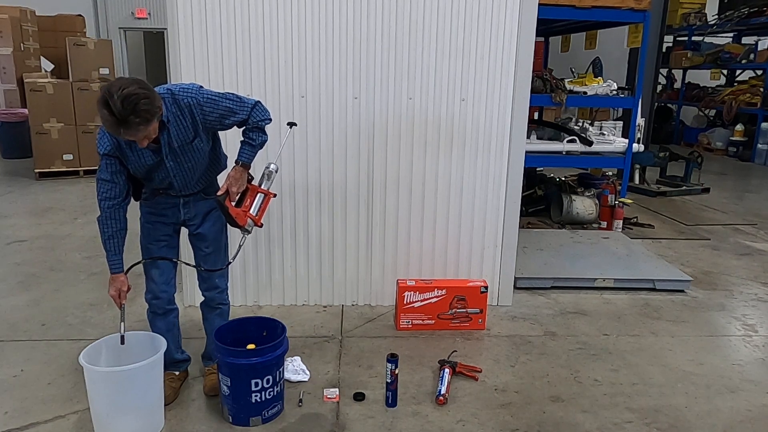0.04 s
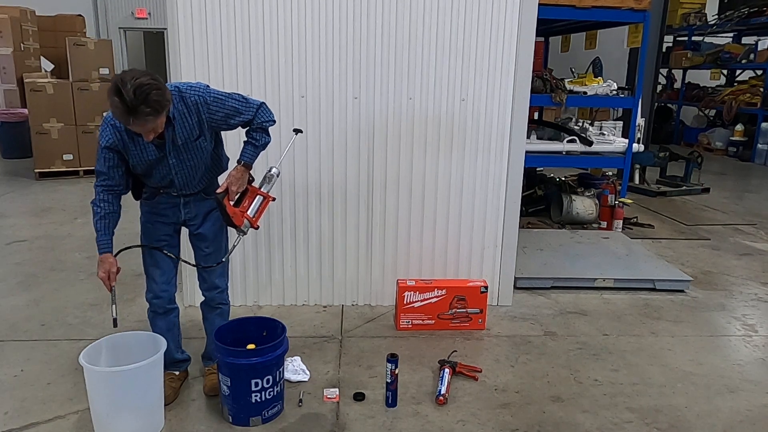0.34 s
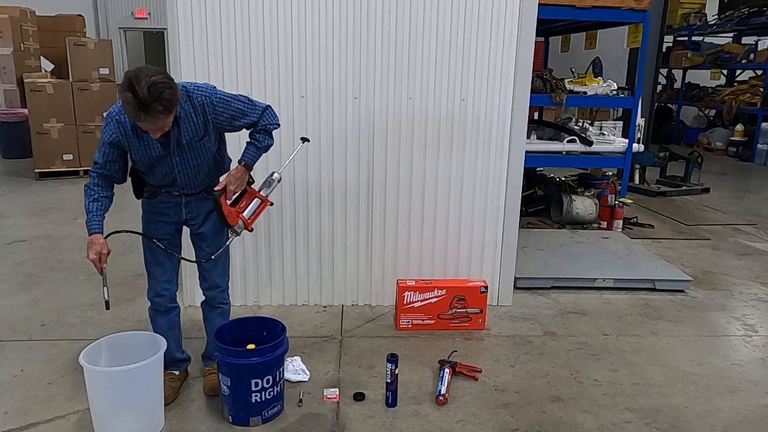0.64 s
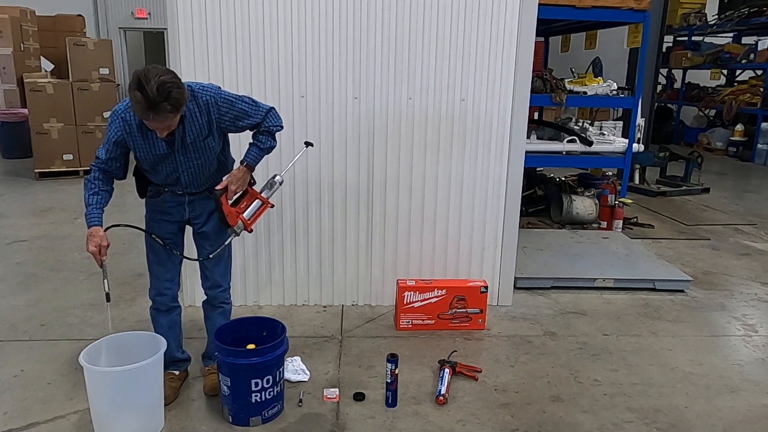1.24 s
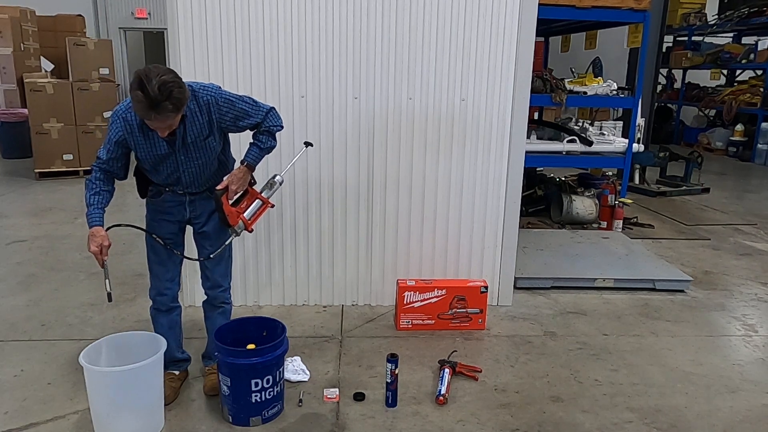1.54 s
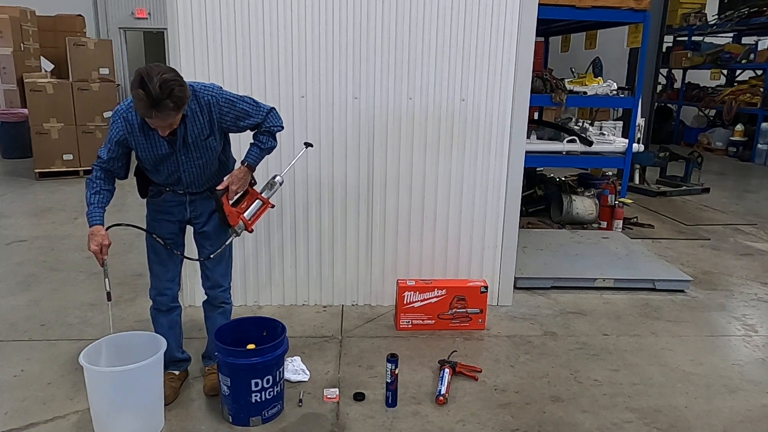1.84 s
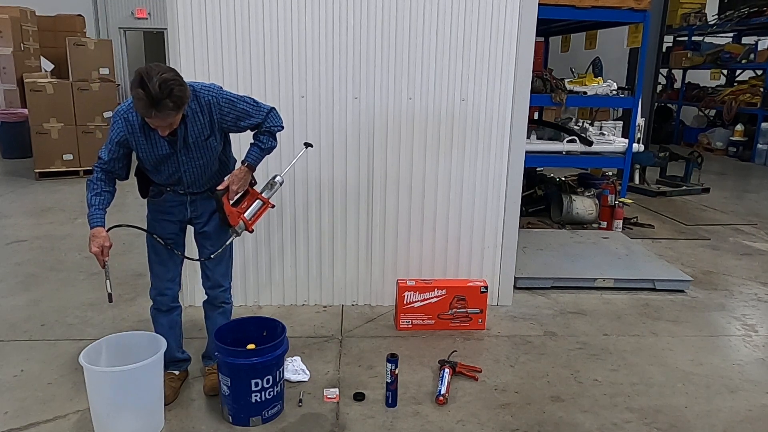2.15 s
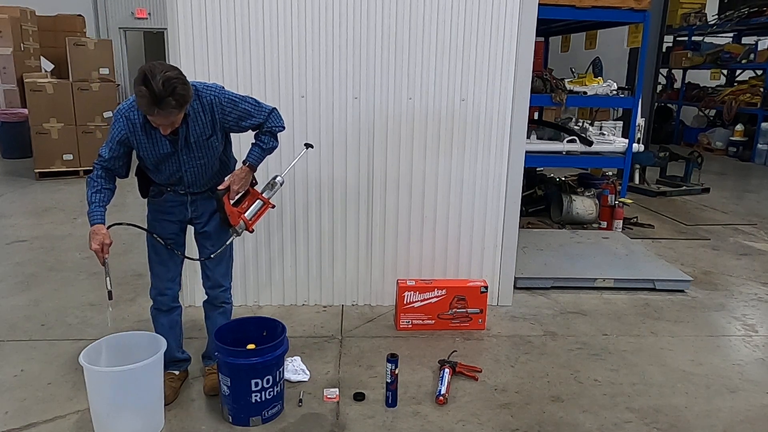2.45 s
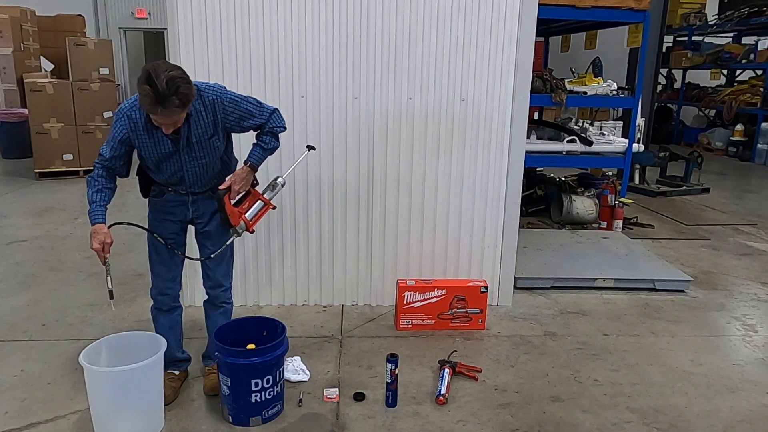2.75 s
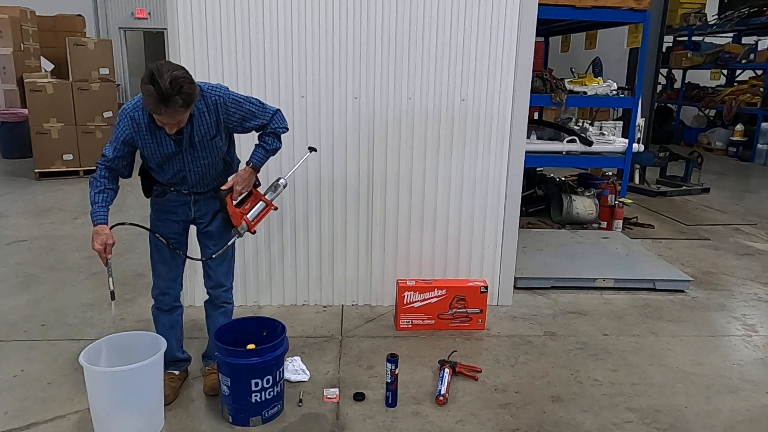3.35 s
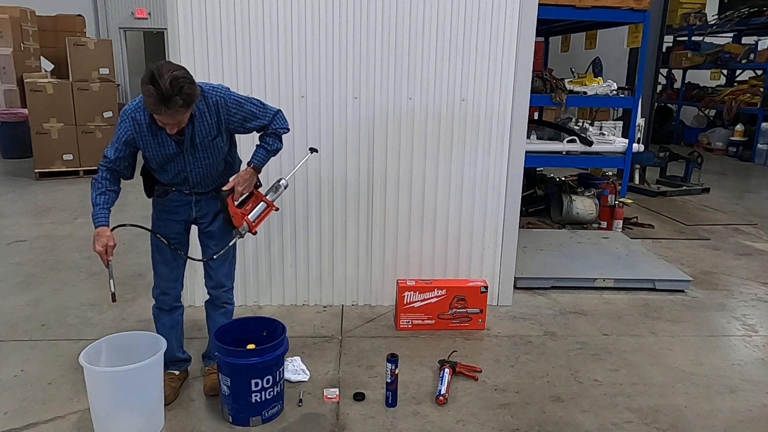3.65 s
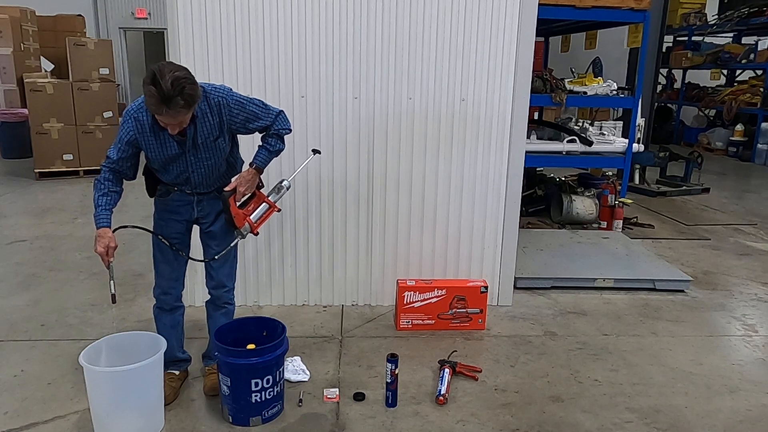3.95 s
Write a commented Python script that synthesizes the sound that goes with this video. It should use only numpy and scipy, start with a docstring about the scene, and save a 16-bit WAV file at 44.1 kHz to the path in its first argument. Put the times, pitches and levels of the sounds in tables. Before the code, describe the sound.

Electric grease gun whirring with rhythmic pitch dips, grease slapping wetly into a bucket.

```python
"""A battery grease gun runs without a break in a large workshop. Its motor and gears whine and whir,
and the pitch sags each time a piston stroke slows the motor. Blobs of grease drop from the hose
into an empty plastic bucket with a wet slap and a thud, and a few bubbles pop. Air spits from the
nozzle, mostly faintly; once an air pocket shoots a blob into the bucket with a hard knock.
Ventilation rumbles underneath."""
import sys
import numpy as np
from scipy import signal
from scipy.fft import rfft, irfft, next_fast_len
from scipy.io import wavfile
from scipy.ndimage import map_coordinates

SR = 44100
rng = np.random.default_rng(int(sys.argv[2]) if len(sys.argv) > 2 else 0)


def unload_wav(signal):
    """Save mono or channel-first audio to the path in sys.argv[1] as 16-bit WAV at rate SR, clipped to [-1, 1]."""
    wavfile.write(
        sys.argv[1],
        SR,
        np.round(np.clip(np.atleast_2d(signal).T, -1, 1) * 32767).astype(np.int16),
    )


N = 176400

# Levels in dB are relative. A fade time (t60) is how long a sound takes to drop by 60 dB.
# The workshop's echo. Each row: frequency in Hz, fade time in seconds.
ECHO_FADES = [(150,1),(400,0.5),(700,0.63),(2000,0.72),(6000,0.37),(14000,0.27)]
# How alike noise is on the left and right. Each row: frequency in Hz, likeness (1 is the same).
STEREO_LIKENESS = [(50,0.98),(300,0.94),(700,0.87),(1500,0.94),(3000,0.88),(5500,0.73),(8000,0.67),(13000,0.65)]
# The left microphone against the right. Each row: frequency in Hz, extra level in dB.
MIC_BALANCE = [(60, 0.5), (110, -2), (200, 1.5), (380, -1), (700, 0.5), (1290, -0.5), (2380, 2.5),
               (4400, 1.5), (8120, -4), (15000, -1.5)]
# Each row: frequency in Hz, how far the left microphone leads in radians.
MIC_PHASE = [(50,0.19),(1100,-0.23),(2300,-0.55),(4500,-0.59),(7500,-1.3),(9000,0.008),(14000,-0.58)]

# The tone colour of each noise. Each row: frequency in Hz, level in dB.
DUCT_SPECTRUM = [(20,-12),(34,-7),(42,-11),(48,10.5),(54,-5),(62,-8),(80,-5),(110,-12.5),(170,-13),(300,-20),(1000,-30),(4000,-70)]
SPIT_SPECTRUM = [(1000,-34),(4500,-22),(7000,2.5),(8500,-4),(10500,-5.5),(12500,-11),(15500,-30)]
CRACK_SPECTRUM = [(300,-11),(1400,-4),(3200,0),(5000,-3),(8000,-7),(10000,-22),(15000,-34)]
SLAP_SPECTRUM = [(100,-24),(250,-9),(450,-1),(520,-5),(650,-0.5),(790,-5),(1000,-3),(1450,-1.5),(1900,-8.5),(3200,-3),(5000,-13),(8000,-16),(15000,-39)]
WHIR_SPECTRUM = [(100,-18),(250,-50),(370,-7),(520,-16),(800,-10),(1000,-9),(1300,-4.5),(2000,0.5),(2900,0),(3800,1.5),(4300,3),(4900,-3.5),(5700,-3.5),(6600,-6),(7100,-9),(8400,-14),(9400,-20.5),(10200,-19),(11000,-25),(13000,-27),(15500,-39.5)]

# Bubbles bursting in the grease. Each row: start in seconds, pitch in Hz, level in dB.
BUBBLES = [(.343,1590,-29),(.904,1050,-26),(3.021,740,-27),(3.041,1429,-23)]
# Air leaving the nozzle. Each row: start in seconds, level in dB, fade time in seconds.
AIR_SPITS = [(.272,-43.5,0.18),(1.375,-50,0.16),(1.861,-21,0.03),(1.893,-42,0.034)]
# The bucket's modes (the notes it rings at) when hit hard. Each row: pitch in Hz, level in dB.
KNOCK_MODES = [(380,-8.5),(610,-10.5),(915,-7),(1160,-9),(1400,-1.5),(1600,-4),(2350,-8),(3080,-1.5),(3330,-6)]
# Its modes under a soft blob. Each row: pitch in Hz, level in dB, fade time in seconds.
THUD_MODES = [(161,-9,0.097),(179.5,-8,0.166),(225,-11,0.15),(270,-18.5,0.19),(311.7,-6.5,0.15),(334.4,-2.5,0.15),(371.4,-5,0.096),(420,-4,0.081),(591.5,-10.5,0.062),(709,-14,0.11),(914,-15,0.11)]
# Blobs landing. Each row: start in seconds, thud level in dB, thud centre in Hz,
# slap level in dB, slap centre in Hz.
BLOBS = [(.005,-38,168,-55,500),(0.324,-40,330,-39,1200),(.343,-31.5,300,-27.5,1410),(0.377,-30.5,300,-40.5,900),(.425,-39.5,300,-39,900),(.5,-37,201,-43,700),(.58,-37,290,-47,700),(.903,-31,800,-23.5,1220),(.915,-32,710,-28.5,1300),(.942,-33,520,-31.5,900),(.964,-24,483,-32,800),(1.023,-29.5,350,-38,800),(1.145,-33.5,270,-47,700),(1.423,-27.5,260,-29,1000),(1.473,-27,255,-25,1000),(1.531,-33,300,-36,600),(1.643,-27,354.3,-33,600),(1.712,-40,260,-51,700),(1.909,-29,320,-19.5,1400),(2.046,-31.5,200,-41,720),(2.159,-31.5,257.6,-36,596),(2.552,-41.5,257,-36,900),(2.658,-31,253,-39.5,709),(2.815,-36,296,-61,700),(2.878,-32,393,-50,700),(3.021,-38,600,-34,750),(3.043,-28.5,357.7,-33.5,1100),(3.101,-30,384,-36,700),(3.125,-22.5,410,-32,750),(3.296,-34.5,420,-46,700),(3.648,-33,370,-33,696.5),(3.662,-29.5,420,-53,600),(3.739,-34,380,-43,696),(3.813,-34.5,317,-45,700)]

# Where the gun's housing rings. Each row: centre in Hz, width in Hz, level in dB.
HOUSING_MODES = [(1185,74,-2.5),(1577,100,2.5),(2178,183,1),(3445,150,-3.5),(3840,190,-3.5),(5736,230,-4.5)]
# Piston strokes. Each row: middle in seconds, drop in motor speed in Hz, half length in seconds.
PISTON_STROKES = [(0.3, 7.661, 0.085), (0.851, 8.75, 0.084), (1.376, 7.819, 0.081), (1.918, 9.105, 0.087),
                  (2.462, 10.309, 0.091), (2.992, 8.501, 0.095), (3.546, 8.53, 0.076),
                  (4.079, 9.009, 0.085)]
# The motor without load. Each row: time in seconds, speed in Hz (turns a second).
FREE_MOTOR_SPEED = [(0.0, 374.1), (0.55, 377.1), (1.1, 374.5), (1.65, 376.5), (2.2, 375.4), (2.7, 377),
                    (3.25, 376.8), (3.8, 375.3)]
# How four tones of the gun swell and dip. Each row: time in seconds, level in dB.
MAIN_WHINE_LEVELS = [(0.0, -37), (0.05, -32), (0.14, -44), (0.19, -33.5), (0.37, -34), (0.66, -31),
                     (0.69, -36.5), (0.86, -28.5), (1.05, -34.5), (1.36, -30), (1.83, -31), (1.9, -33.5),
                     (2.06, -28.5), (2.08, -30.5), (2.24, -31), (2.27, -26), (2.42, -36), (2.45, -44),
                     (2.58, -30), (2.77, -32), (2.83, -27.5), (3.0, -42), (3.04, -32.5), (3.16, -37.5),
                     (3.32, -32), (3.48, -34.5), (3.52, -41), (3.59, -33), (3.87, -28.5), (4.0, -33)]
LOW_WHINE_LEVELS = [(0.0, -41), (0.13, -44.5), (0.19, -38), (0.68, -43), (0.81, -36.5), (1.02, -43.5),
                    (1.36, -37.5), (1.64, -40.5), (1.65, -42), (2.23, -36.5), (2.32, -47), (2.35, -37),
                    (2.49, -51), (2.61, -36), (2.88, -35.5), (2.97, -49), (3.14, -35), (3.26, -42.5),
                    (3.41, -33.5), (3.51, -48.5), (3.74, -33), (3.81, -37), (3.95, -32), (4.0, -39)]
GEAR_TONE_LEVELS = [(0.0, -51), (0.26, -46), (0.75, -47), (0.77, -41), (1.24, -47), (1.3, -41), (1.54, -47),
                    (1.61, -40), (1.8, -46), (1.84, -42), (2.31, -44), (2.38, -39), (2.49, -44),
                    (3.01, -42), (3.42, -49), (3.45, -41), (3.87, -41), (4.0, -40)]
OCTAVE_LEVELS = [(0.0, -56), (0.72, -54), (0.89, -67), (0.91, -58), (1.24, -54.5), (1.4, -63), (1.56, -54),
                 (1.75, -54.5), (1.84, -64), (1.86, -52), (1.93, -62), (2.31, -59), (2.36, -68),
                 (2.45, -53), (2.56, -67), (2.9, -62), (2.99, -55), (3.09, -65), (3.31, -69), (3.58, -53),
                 (3.63, -68), (4.0, -60)]
# Weaker motor and gear tones. The three lists give each tone's multiple of the motor speed,
# its level in dB without load, and its change in dB at full load.
WEAK_MULTIPLES = [1, 3, 5.92, 6, 9.2, 9.56, 9.8, 18, 21]
WEAK_LEVELS = [-56.5, -46.5, -63, -45.5, -57, -56, -50, -56, -62.5]
WEAK_LOAD_CHANGES = [-6, -2.5, 18.5, -14, 4, -9, 2, 0, 7]


def amp(db):
    """Turn decibels into a gain to multiply by."""
    return 10 ** (np.asarray(db) / 20)


def unit(x):
    """Scale a signal to an average power of 1."""
    return x / np.sqrt(np.mean(x ** 2) + 1e-20)


def along(points, hz):
    """Read between (Hz, value) points on a log-frequency axis."""
    freqs, values = np.transpose(points)
    return np.interp(np.log(hz + 1), np.log(freqs + 1), values)


def shape(points):
    """Turn (Hz, dB) points into a function giving the gain at any frequency."""
    return lambda hz: amp(along(points, hz))


def around(hz, centre_hz, octaves):
    """A bell-shaped gain that favours frequencies near the centre."""
    return np.exp(-0.5 * (np.log2((hz + 1) / centre_hz) / octaves) ** 2)


def curve(rows):
    """Join (seconds, value) points into one value per sample."""
    return np.interp(np.arange(N) / SR, *np.transpose(rows))


def wobble(rate):
    """A smooth curve through `rate` random values a second."""
    return map_coordinates(rng.standard_normal(8192), [np.arange(N) * rate / SR + 2], mode="wrap")


def rise(t, seconds):
    """Climb from 0 towards 1, softening the start of a sound."""
    return 1 - np.exp(-t / seconds)


def fade(t, t60):
    """Die away by 60 dB every t60 seconds."""
    return np.exp(-np.log(1000) * t / t60)


def filtered(x, response):
    """Multiply each frequency in x by response(hz)."""
    n = x.shape[-1]
    padded = next_fast_len(n + 8192)
    return irfft(rfft(x, padded) * response(np.fft.rfftfreq(padded, 1 / SR)), padded)[..., :n]


def noise(size, colour):
    """Coloured stereo noise of power 1; left and right are less alike in the treble."""
    def response(hz):
        spread = np.arccos(np.clip(along(STEREO_LIKENESS, hz), -1, 0.999)) / 2
        return colour(hz) * np.array([np.cos(spread), np.sin(spread)])
    mid, side = filtered(rng.standard_normal((2, size)), response)
    return unit(np.array([mid + side, mid - side]))


def tone(turns, multiple, waver_db, rough):
    """A wavering, slightly rough tone at a multiple of a shaft's speed."""
    shake = rough * (wobble(130) + 1j * wobble(130))
    wave = np.real((1 + shake) * np.exp(2j * np.pi * multiple * turns))
    return np.sqrt(2) * amp(waver_db * wobble(22.24)) * wave


def add(track, start, sound):
    """Mix a sound into the track at `start` seconds."""
    part = track[:, round(start * SR):][:, :sound.shape[-1]]
    part += sound[..., :part.shape[1]]


def in_workshop(x, echo_db=-3.5):
    """Add the room's echo, a tail of noise whose treble dies first."""
    hz, t, spectrum = signal.stft(noise(SR * 2 // 3, lambda hz: 1), SR, nperseg=256)
    tail = signal.istft(spectrum * fade(t, along(ECHO_FADES, hz)[:, None]), SR, nperseg=256)[1]
    tail = amp(echo_db) * tail / np.linalg.norm(tail[0])
    tail[:, 0] += 1  # the direct sound
    return signal.fftconvolve(np.atleast_2d(x), tail, axes=1)


def ventilation():
    """A big slow fan hums over the rumble of its ducts."""
    hum_hz = 45.5 + 2.3 * wobble(12)
    hum = amp(-52.5) * tone(np.cumsum(hum_hz) / SR, multiple=1, waver_db=3.5, rough=0.066)
    return hum + amp(-57) * noise(N, shape(DUCT_SPECTRUM))


def bubble_pops():
    """Each bursting bubble rings briefly at one pitch."""
    out, t = np.zeros((2, N)), np.arange(SR // 4) / SR
    for start, hz, db in BUBBLES:
        ring = amp(db) * np.sin(2 * np.pi * hz * t) * fade(t, t60=0.036) * rise(t, seconds=0.002)
        add(out, start, in_workshop(ring))
    return out


def nozzle_spits():
    """Trapped air bursts out with a short bright hiss."""
    out, t = np.zeros((2, N)), np.arange(SR // 4) / SR
    for start, db, t60 in AIR_SPITS:
        hiss = amp(db) * noise(len(t), shape(SPIT_SPECTRUM)) * fade(t, t60)
        add(out, start, in_workshop(hiss, echo_db=-8.5))
    return out


def bucket_knock():
    """The blob shot out by the air hits hard enough to ring the bucket's stiff upper modes."""
    out, t = np.zeros((2, N)), np.arange(SR // 4) / SR
    fade_cycles = 48
    ring = sum(rng.choice([-1, 1]) * amp(db) * fade(t, fade_cycles / hz) * np.sin(2 * np.pi * hz * t)
               for hz, db in KNOCK_MODES)
    crack = noise(len(t), shape(CRACK_SPECTRUM)) * fade(t, t60=0.025)
    knock = (amp(-19) * ring + amp(-23) * crack) * rise(t, seconds=0.00023)
    add(out, start=1.9052, sound=in_workshop(knock))
    return out


def bucket_thud(t, centre_hz):
    """A blob rings the bucket, a little differently each time; softer blobs reach only low modes."""
    ring = np.zeros(len(t))
    for hz, db, t60 in THUD_MODES:
        level_chance, pitch_chance = rng.standard_normal(2)
        gain = amp(db + 1.5 * level_chance) * around(hz, centre_hz, octaves=0.89)
        pitch_hz = hz * (1 + 0.0051 * pitch_chance)
        ring += gain * fade(t, t60) * np.sin(2 * np.pi * pitch_hz * t + np.pi * pitch_chance)
    return ring * rise(t, seconds=0.0022)


def falling_blobs():
    """Each blob lands on the bottom of the bucket with a thud and a wet slap."""
    out, t = np.zeros((2, N)), np.arange(SR // 4) / SR
    for start, thud_db, thud_hz, slap_db, slap_hz in BLOBS:
        thud = amp(thud_db) * bucket_thud(t, thud_hz)
        splash = noise(len(t), lambda hz: shape(SLAP_SPECTRUM)(hz) * around(hz, slap_hz, octaves=1.27))
        slap = amp(slap_db) * splash * fade(t, t60=0.074) * rise(t, seconds=0.00053)
        add(out, start, in_workshop(thud + slap))
    return out


def housing_response(hz):
    """The gun's housing rings at its modes but is too small to give out much bass."""
    bass_cut_hz = 580
    modes = sum((-1) ** k * amp(db) * 1j * hz * width / (centre ** 2 - hz ** 2 + 1j * hz * width)
                for k, (centre, width, db) in enumerate(HOUSING_MODES))
    return modes * (1 - np.exp(-(hz / bass_cut_hz) ** 4))


def gear_whir(load):
    """Gear teeth make a grainy noise that rings the housing and grows a touch louder under load."""
    whir = amp(-35) * noise(N, shape(WHIR_SPECTRUM))
    housing = amp(-38) * noise(N, housing_response)
    grain = unit(np.exp(0.1 * wobble(900)))
    swell_db = 0.36 * load + 0.72 * wobble(13)
    return (whir + housing) * grain * amp(swell_db)


def motor_whine(turns, load):
    """Motor and gear tones follow the shaft's speed; load makes the main whine rougher."""
    whine = (
        amp(curve(MAIN_WHINE_LEVELS) + 1) * tone(turns, 12, waver_db=-1.28, rough=0.1 + 0.22 * load)
        + amp(curve(LOW_WHINE_LEVELS) + 2) * tone(turns, 9, waver_db=1.4, rough=0.046)
        + amp(curve(GEAR_TONE_LEVELS) - 2.5) * tone(turns, 10.27, waver_db=1.6, rough=0.17)
        + amp(curve(OCTAVE_LEVELS) - 1) * tone(turns, 24, waver_db=-0.2, rough=0.1))
    for multiple, db, load_db in zip(WEAK_MULTIPLES, WEAK_LEVELS, WEAK_LOAD_CHANGES):
        whine += amp(db + load_db * load) * tone(turns, multiple, waver_db=1, rough=0.12)
    return in_workshop(whine, echo_db=-14)[:, :N]


def grease_gun():
    """Every piston stroke loads the motor and slows it, so all its tones sag together."""
    t = np.arange(N) / SR
    squareness, flutter_hz = 2.725, 0.29
    sag_hz = sum(drop_hz * np.exp(-np.abs((t - middle) / half_length) ** squareness)
                 for middle, drop_hz, half_length in PISTON_STROKES)
    load = sag_hz / sag_hz.max()  # 0 running free, 1 at the hardest stroke
    speed_hz = curve(FREE_MOTOR_SPEED) - sag_hz + flutter_hz * wobble(35.3)
    turns = np.cumsum(speed_hz) / SR
    return motor_whine(turns, load) + gear_whir(load)


def scene():
    """The gun, its grease and its spits of air over the ventilation."""
    return (grease_gun() + falling_blobs() + bucket_knock() + bubble_pops() + nozzle_spits()
            + ventilation())


def record(dry):
    """Two close microphones, slightly different in tone colour, that miss the highest treble."""
    side, top_hz = np.array([[0.5], [-0.5]]), 15750  # left and right each take half the difference

    def response(hz):
        balance = amp(side * along(MIC_BALANCE, hz))
        phase_shift = np.exp(1j * side * along(MIC_PHASE, hz))
        return balance * phase_shift * (hz < top_hz)
    return filtered(dry, response)


dry = scene()
out = record(dry)
unload_wav(out)
```